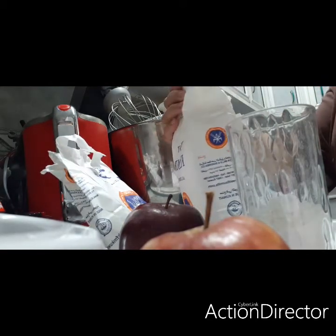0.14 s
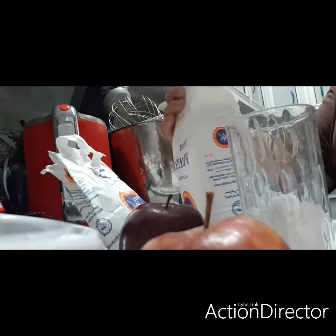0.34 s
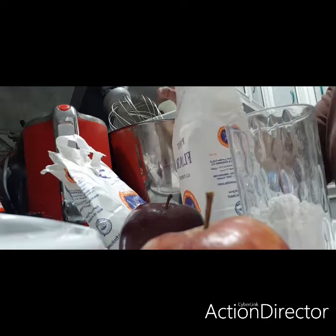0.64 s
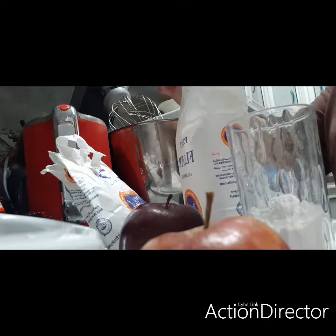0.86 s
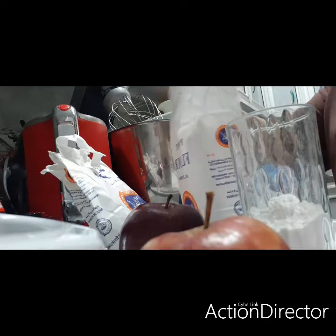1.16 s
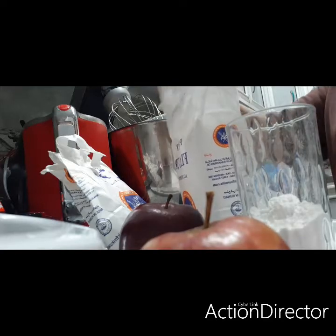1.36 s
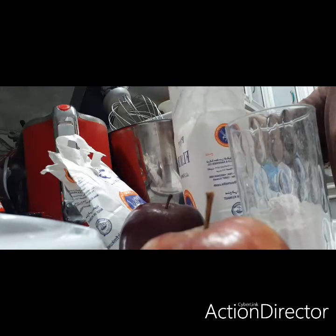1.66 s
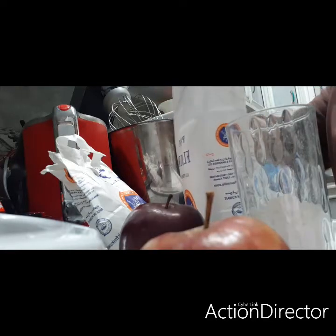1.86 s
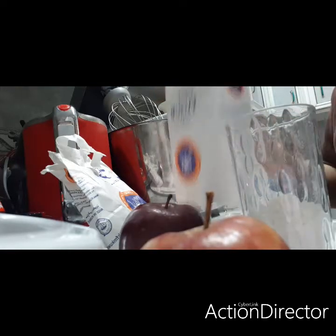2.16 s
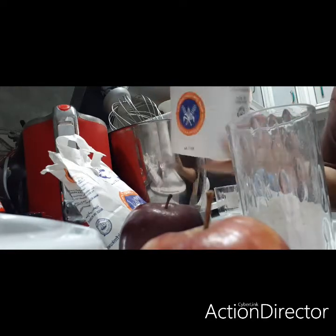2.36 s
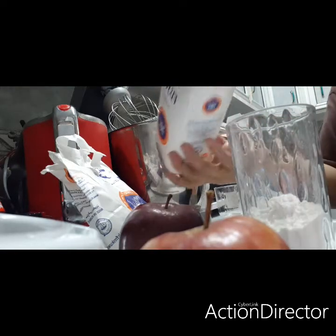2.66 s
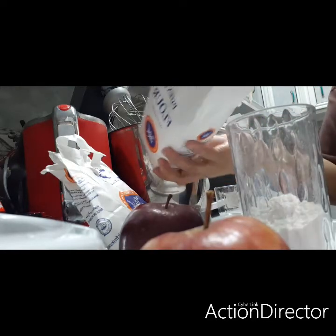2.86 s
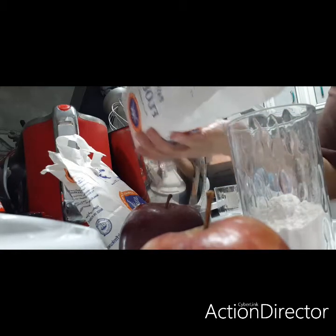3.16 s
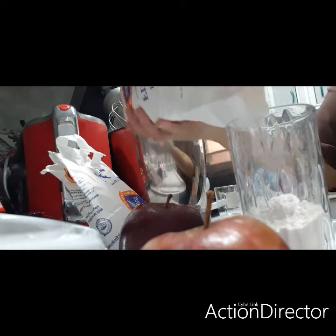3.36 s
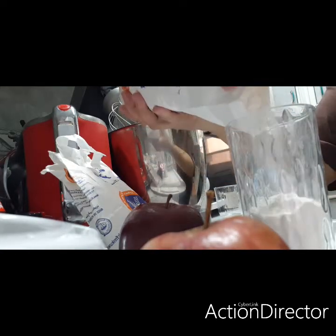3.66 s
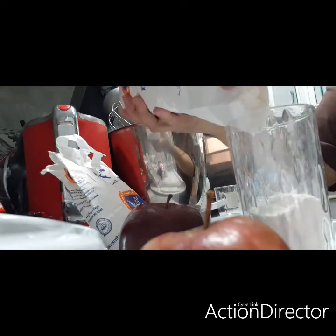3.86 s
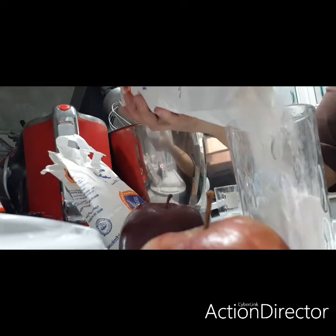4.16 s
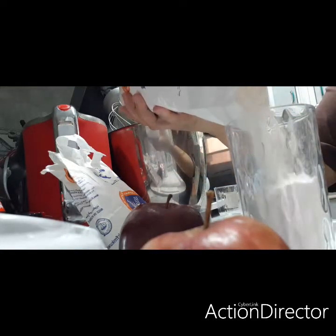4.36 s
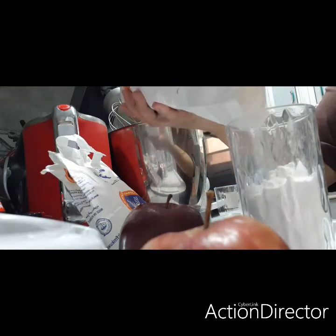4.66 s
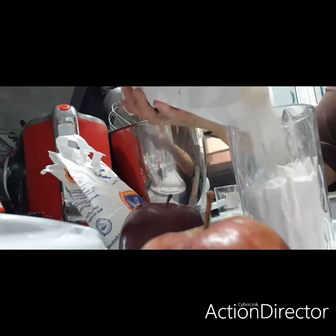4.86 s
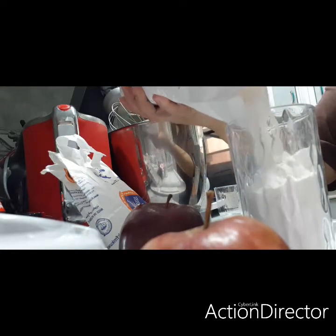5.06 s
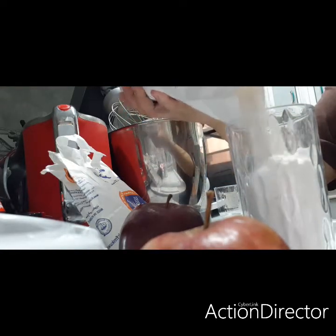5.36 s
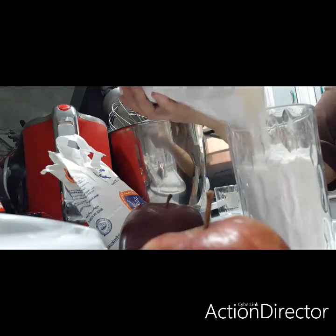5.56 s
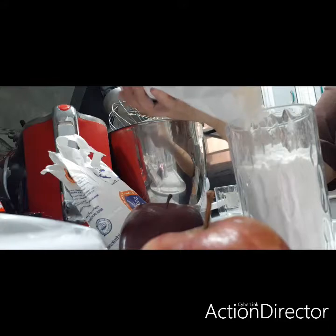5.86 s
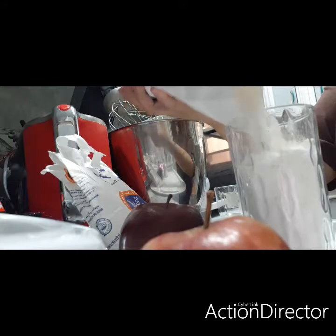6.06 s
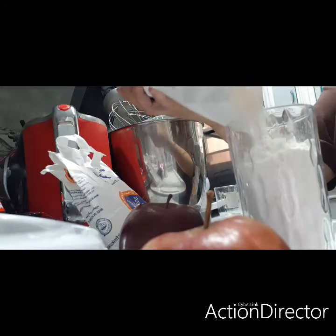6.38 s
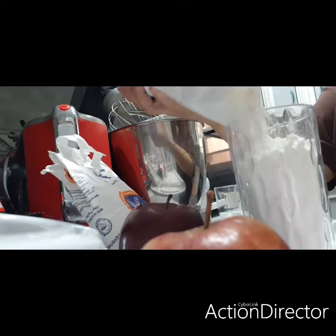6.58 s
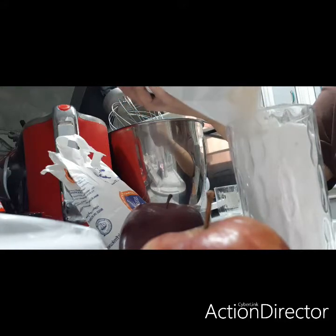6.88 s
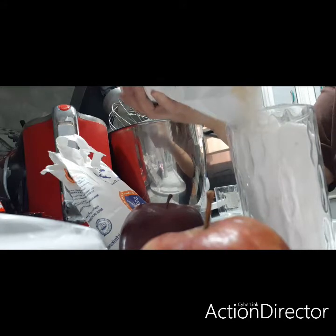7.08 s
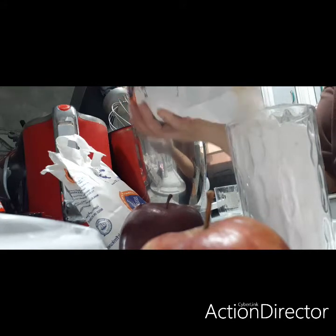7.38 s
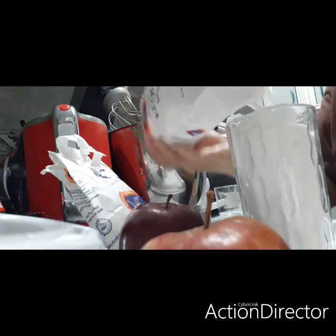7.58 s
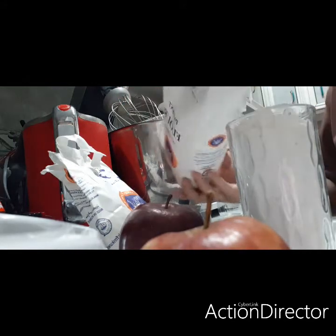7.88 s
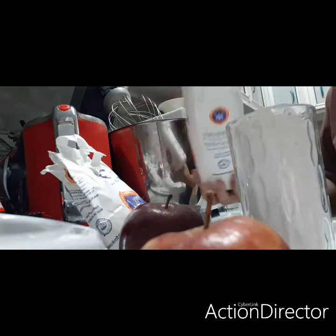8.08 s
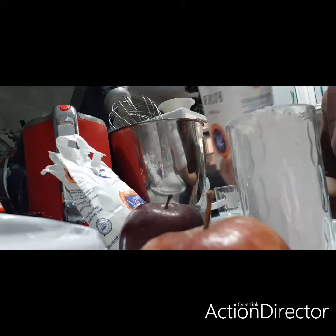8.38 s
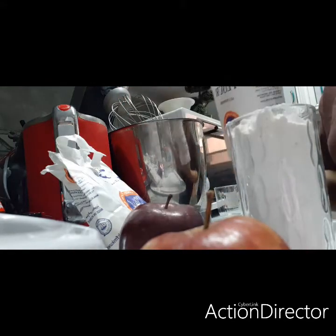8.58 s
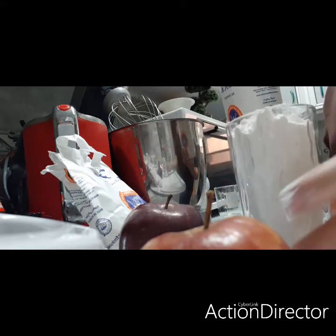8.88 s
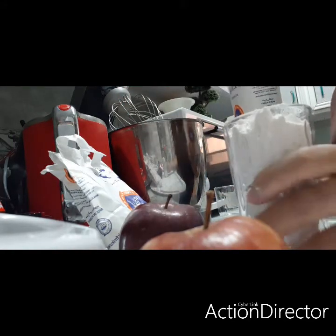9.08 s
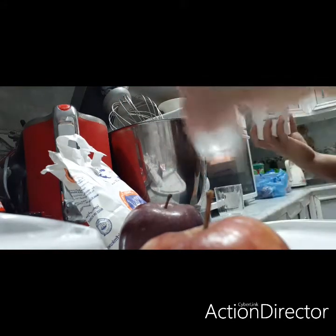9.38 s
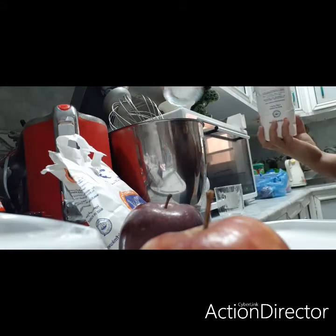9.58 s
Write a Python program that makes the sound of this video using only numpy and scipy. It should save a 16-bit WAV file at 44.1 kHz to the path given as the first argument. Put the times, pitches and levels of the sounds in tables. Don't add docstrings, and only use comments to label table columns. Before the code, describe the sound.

Close stereo pickup in a hard-walled kitchen: hands unroll a heavy paper flour bag with dense bright crackles and hollow panel pops. The mouth is yanked open with one very loud crack just after a second, then handling calms. The bag is tipped and shaken, giving soft rustles, ticks and a hushed slide of flour, and finally a faint low knock on the counter over quiet hum and thin hiss.

```python
import sys
import numpy as np
from scipy import signal
from scipy.fft import rfft, irfft, next_fast_len
from scipy.io import wavfile
from scipy.ndimage import uniform_filter1d, map_coordinates

SR = 44100
rng = np.random.default_rng(int(sys.argv[2]) if len(sys.argv) > 2 else 0)


def ratio(d):
    e = np.asarray(d, float) / 20
    return 10 ** e


def persist_wave(psi):
    counts = np.round(np.clip(psi, -1, 1) * 32767).astype(np.int16)
    wavfile.write(sys.argv[1], SR, np.atleast_2d(counts).T)


N = 429093

# freq_hz, likeness (1 = identical)
STEREO_LIKENESS = [(40, 0.61), (150, 0.75), (500, 0.78), (1200, 0), (2500, .0), (15000, 0.053)]


def unit(x):
    return x / np.sqrt(np.mean(x ** 2) + 1e-20)


def along(points, hz):
    f, v = np.transpose(points)
    return np.interp(np.log(hz + 1), np.log(f + 1), v)


def curves(rows):
    s, *columns = np.transpose(rows)
    return [np.interp(np.arange(N) / SR, s, c) for c in columns]


def filtered(x, response):
    m = next_fast_len(N + 8192)
    return irfft(rfft(x, m) * response(np.fft.rfftfreq(m, 1 / SR)), m)[..., :N]


def add(track, s, sound):
    track[:, round(s * SR):][:, :sound.shape[1]] += sound


def left_right(db):
    return ratio(db * np.array([[.5], [-.5]]))


def rush(spectrum, envelope=1, patchy_db=0):
    z = signal.stft(envelope * rng.standard_normal((2, N)), nperseg=256)[2]
    patches = rng.standard_normal(z.shape[1:])
    patches = uniform_filter1d(uniform_filter1d(patches, size=5, axis=0), size=12, axis=1)
    noise = signal.istft(z * ratio(patchy_db * unit(patches)), nperseg=256)[1][:, :N]

    def mid_side(hz):
        turn = np.arccos(np.clip(along(STEREO_LIKENESS, hz), -1, 1)) / 2
        return ratio(along(spectrum, hz)) * [np.cos(turn), np.sin(turn)]

    mid, side = filtered(noise, mid_side)
    return unit(np.array([mid + side, mid - side]))


def background():
    # freq_hz, density_db per Hz
    hum_spectrum = [(15, -47), (25, -23), (41, -16.5), (65, -9.5), (101, -5.5), (119, -16.5), (178, -6),
                    (420, -14), (864, -39.5), (5500, -41.5), (7150, -66.5), (12100, -120)]
    # freq_hz, density_db per Hz
    hiss_spectrum = [(3500, -16.5), (6050, -20.5), (6370, -1.5), (6600, -9), (6950, -11), (7200, -21),
                     (15500, -20), (16000, -46)]
    # time_s, gain_db
    ducking = [
        (2.44, -6),
        (2.5, 0),
    ]
    noise = ratio(-64) * rush(hum_spectrum, patchy_db=1.9) + ratio(-75) * rush(hiss_spectrum, patchy_db=.6)
    mains = ratio(-76.5) * np.sin(2 * np.pi * 59 * np.arange(N) / SR)
    return ratio(curves(ducking)[0]) * (noise * ratio([[-.6], [.6]]) + mains)


def kitchen(x):
    # freq_hz, t60_s
    decay = [(200, 0.15), (1500, 0.55), (6000, 0.38), (14000, 0.07)]
    wet, hop = np.zeros((2, N + 2 * SR)), SR // 3
    for start in range(0, N, hop):
        hz, t, z = signal.stft(rng.standard_normal((2, 16384)), SR, nperseg=256)
        alike = np.clip(along(STEREO_LIKENESS, hz), 0, 1)[:, None]
        z[1] = alike * z[0] + np.sqrt(1 - alike ** 2) * z[1]
        tail = signal.istft(z * ratio(-60 * t / along(decay, hz)[:, None]), SR, nperseg=256)[1]
        tail = tail / np.linalg.norm(tail[0])
        add(wet, start / SR + .003, signal.fftconvolve(x[:, start:start + hop], tail, axes=1))
    return wet[:, :N]


def bumps():
    # start_s, peak_db, pitch_hz
    counter = [
        (1.246, -30.5, 180),
        (8.966, -41, 108),
        (9.147, -48.5, 105),
        (9.176, -50, 135),
    ]
    # start_s, peak_db, pitch_hz
    palm = [(.39, -47, 150), (.744, -41, 156), (.944, -42, 170), (1.188, -29, 175), (1.449, -30, 170),
            (1.972, -42, 172), (2.006, -36, 110), (3.022, -42, 150), (3.894, -40, 135), (6.31, -46, 127),
            (5.858, -42, 150), (6.76, -43, 130)]
    track, t = np.zeros((2, N + SR)), np.arange(SR // 5) / SR
    knocks = [(*row, .14) for row in counter] + [(s, db - 4, hz, .06) for s, db, hz in palm]
    for s, db, hz, t60 in knocks:
        knock = np.sin(2 * np.pi * hz * t) * ratio(-60 * t / t60) * (1 - np.exp(-t / .006))
        add(track, s - .004, ratio(db) * left_right(1.8) * knock / np.abs(knock).max())
    return track[:, :N]


def wobble(rate):
    return map_coordinates(rng.standard_normal(int(N * rate / SR) + 4), [np.arange(N) * rate / SR])


def crumple(rate, spread_db, t60, smooth):
    sizes = ratio(spread_db * np.minimum(rng.exponential(size=N), 3))
    kicks = (rng.random(N) < rate / SR) * sizes
    return smooth + unit(signal.lfilter([1], [1, -ratio(-60 / SR / t60)], kicks))


def handling():
    # time_s, level_db
    grip = [(0, -50), (.26, -53), (1.1, -60), (1.6, -55), (1.84, -76), (2.2, -76), (2.44, -85), (2.51, -57),
            (2.9, -54), (3.3, -58), (3.86, -76), (3.9, -55), (4.8, -59), (4.93, -73), (6.5, -59),
            (7.3, -63), (8.5, -64), (9.04, -87)]
    # peak_s, fade_s per 10 dB, flex_db, scuff_db
    working = [(.37, .12, -42, -44.5), (.5, .11, -43, -42), (.75, .09, -38, -42), (.97, .14, -40, -44),
               (1.232, .025, -21, -29), (1.3, .1, -36, -39.5), (1.475, .08, -36, -35),
               (1.68, .07, -39, -50), (1.995, .08, -35.5, -39), (2.275, .1, -49, -56),
               (2.67, .035, -48, -46), (.84, .02, -45, -40), (2.508, .02, -55, -50),
               (2.99, .14, -45.5, -49)]
    # peak_s, fade_s per 10 dB, flex_db, scuff_db
    shakes = [(4.03, .15, -62, -50), (4.27, .06, -58, -53), (3.41, .09, -54, -49), (3.62, .1, -52, -48),
              (4.54, .12, -48, -45), (4.69, .05, -53, -51), (5.21, .05, -54, -53), (5.01, .06, -51, -59),
              (5.12, .12, -64, -55), (3.17, .09, -51, -60), (5.31, .07, -43, -45), (5.7, .08, -53, -49),
              (5.83, .07, -44, -44.5), (5.97, .06, -47.5, -54), (6.14, .08, -47.5, -54),
              (6.27, .08, -54, -51), (6.59, .06, -47, -46.5), (6.73, .14, -48, -48.5),
              (7.17, .14, -53, -52), (7.61, .06, -50, -52.5), (7.71, .1, -62, -48), (7.845, .06, -54, -42),
              (7.965, .04, -60, -45), (7.99, .03, -61.5, -38), (8.025, .05, -44.5, -49),
              (8.185, .04, -55, -42), (8.33, .11, -47, -49), (8.72, .17, -72, -56.5), (8.85, .06, -57, -64),
              (9.197, .04, -57, -70)]
    rise_share = .65
    t = np.arange(0, N / SR + .002, .002)
    s, fade_s, *peak_db = np.transpose([*working, *shakes])[:, :, None]
    fall_db = 10 * np.where(t > s, t - s, (s - t) / rise_share) / fade_s
    grip_db = np.interp(t, *np.transpose(grip)) + [[0], [1.5]]
    power = np.sum(ratio(2 * (np.array(peak_db) - fall_db)), axis=1) + ratio(2 * grip_db)
    return curves(np.transpose([t, *10 * np.log10(power)]))


def rustle():
    # freq_hz, density_db per Hz
    body_spectrum = [(35, -45.5), (60, -4.5), (163, 1), (414, 1.5), (612, -10.5), (700, -6.5), (910, -28.5),
                     (1540, -120)]
    # freq_hz, density_db per Hz
    flex_spectrum = [(210, -41.5), (350, -11), (622, -4), (1020, -8.5), (1240, -7.5), (2060, -12),
                     (3000, -17), (3900, -45.5), (6600, -120)]
    # freq_hz, density_db per Hz
    scuff_spectrum = [(1290, -21), (2200, -13.5), (3100, -8), (4100, -2.5), (4680, -4), (6700, -.5),
                      (7640, -5.5), (13100, -12), (15000, -10.5), (16000, -15)]
    # time_s, body_db
    heft = [(0.0, -70), (1.1, -55), (1.25, -35), (1.7, -61), (2.05, -58), (2.46, -72), (2.95, -55),
            (3.4, -64), (6.8, -56.5), (9.73, -67.5)]
    flex_db, scuff_db = handling()
    busy = np.clip((scuff_db + 56) / 12, .12, 1.5)
    buckles = busy * ratio(1.2 * wobble(30)) * crumple(220, spread_db=3, t60=0.015, smooth=0.043)
    fine_buckles = crumple(330, spread_db=2, t60=.009, smooth=0.81)
    body = rush(body_spectrum, crumple(60, spread_db=0, t60=0.013, smooth=1.8), patchy_db=2.5)
    flex = rush(flex_spectrum, buckles + .6 * fine_buckles, patchy_db=2.0)
    scuff = rush(scuff_spectrum, (.55 * buckles + .9) * ratio(1.5 * wobble(18)), patchy_db=3.0)
    body_db = 0.67 * curves(heft)[0] + 0.34 * flex_db
    sheet = ratio(body_db) * body + ratio(np.minimum(flex_db, -34) - 1.5) * flex + ratio(scuff_db - 4) * scuff
    return sheet * left_right(2.8)


def panel_pop(panel_hz):
    t = np.arange(1536) / SR
    draw = rng.random((17, 4))
    hz = np.append(panel_hz, 430 * 5.8 ** draw[1:, 0])[:, None, None]
    gain_db = np.append(0, -8 - 7 * draw[1:, 1])[:, None, None]
    octaves = np.log2(hz / panel_hz)
    gain = ratio(gain_db + np.minimum(-5 * octaves, 14 * octaves))
    lag = 0.00032 * (draw[:, 2:, None] - .5) * hz / 1200
    t60 = 0.034 * (800 / hz) ** 0.3
    ring = np.sum(gain * np.sin(2 * np.pi * hz * (t - lag)) * ratio(-60 * t / t60), 0)
    ring = ring * (1 - np.exp(-t / 0.0003))
    pushes = rng.standard_normal((1, 512)) ** 3 * t[:512] * np.exp(-t[:512] / 0.00071)
    pop = signal.fftconvolve(ring, pushes, axes=1)
    return pop / np.abs(pop).max()


def pops():
    # start_s, peak_db, panel_hz
    unroll = [(0.053, -25.5, 507), (0.107, -22.5, 627), (0.182, -35, 905), (0.306, -34.5, 818),
              (0.383, -21.5, 945), (0.438, -28, 1160), (0.471, -26, 610), (0.509, -25, 494),
              (0.585, -22, 1375), (0.656, -24, 430), (0.701, -28, 700), (0.74, -23.5, 710),
              (0.843, -29, 650), (0.855, -26, 1200), (0.93, -24, 1200), (1.018, -22, 950),
              (1.063, -31.5, 480)]
    # start_s, peak_db, panel_hz
    opening = [(1.152, -22, 910), (1.189, -18, 1200), (1.224, -5.5, 1180), (1.245, -13, 619),
               (1.271, -19, 617), (1.3685, -17, 700), (1.436, -21, 1250), (1.465, -16, 1210),
               (1.51, -28, 778), (1.606, -19, 760), (1.684, -21, 1244), (1.797, -27.5, 526),
               (1.9075, -21.5, 1160), (1.958, -23, 460), (1.978, -17, 510), (2.004, -26, 483),
               (2.128, -31, 590), (2.249, -25, 540), (2.548, -28.5, 1610), (2.629, -33, 1400),
               (2.806, -36.5, 479), (3.403, -28, 2130), (3.635, -37, 447)]
    # start_s, peak_db, panel_hz
    pouring = [(3.894, -20.5, 512), (4.705, -29.5, 510), (5.27, -33.5, 1270), (5.311, -29.5, 403),
               (5.596, -27.5, 1260), (5.666, -34, 1330), (5.71, -34.5, 1680), (5.809, -32, 735),
               (5.849, -31, 473), (5.957, -35, 446), (5.988, -30, 720), (6.109, -34, 1370),
               (6.313, -38, 480), (6.565, -32, 730), (6.595, -31, 485), (6.618, -30, 570),
               (6.696, -34, 710), (6.71, -23, 1280), (6.753, -26, 492), (6.913, -35, 480),
               (7.953, -41, 440), (8.015, -30, 514), (8.197, -23.5, 1200), (8.325, -28.5, 1170)]
    # start_s, peak_db, panel_hz
    flicks = [(.348, -32, 716), (.767, -24, 619), (.796, -27, 1290), (.952, -27, 589), (.968, -29, 665),
              (1.074, -31, 713), (1.083, -29, 716), (1.092, -29, 479), (1.105, -31, 708), (1.163, -21, 956),
              (1.207, -17, 622), (1.288, -19, 684), (1.304, -16, 1460), (1.325, -21, 466),
              (1.935, -28, 713), (2.53, -37, 608), (2.664, -40, 942), (2.974, -35, 412), (3.008, -28, 1350),
              (3.05, -36, 676), (7.844, -41, 455), (7.859, -37, 417), (8.029, -32, 525), (8.838, -46, 474),
              (8.857, -46, 638), (9.204, -47, 1500)]
    # start_s, peak_db, panel_hz
    fold_taps = [(0.09, -26, 595), (0.15, -33, 425), (0.205, -41, 423), (0.238, -39, 517),
                 (0.324, -31, 705), (1.404, -25, 705), (1.597, -25, 729), (1.642, -30, 479),
                 (1.744, -37, 705), (1.815, -39, 746), (2.793, -36, 506), (3.329, -40, 441),
                 (4.426, -40, 716), (4.544, -33, 713), (4.734, -44, 406), (4.831, -44, 487),
                 (4.998, -37, 501), (5.217, -40, 466), (5.567, -43, 511), (5.793, -29, 490),
                 (5.862, -32, 471), (5.945, -36, 455), (6.026, -41, 495), (6.13, -32, 638),
                 (6.151, -36, 517), (6.443, -39, 633), (6.486, -41, 482), (6.637, -37, 708),
                 (6.776, -34, 455), (6.871, -41, 498), (7.087, -42, 463), (8.096, -42, 654)]
    # start_s, peak_db, panel_hz
    further_pops = [(.275, -38, 600), (.385, -24, 1300), (.546, -37, 900), (.613, -39, 1500),
                    (.686, -34, 1300), (.712, -28, 600), (.741, -26, 1250), (.784, -34, 1300),
                    (.968, -35, 1300), (1.2438, -10, 615), (1.19, -23, 600), (1.272, -22, 1200),
                    (1.453, -24, 600), (1.673, -30, 600), (2.041, -36, 1300), (2.127, -35, 1400),
                    (2.743, -43, 600), (3.4, -33, 620), (3.941, -44, 600), (5.715, -40, 600),
                    (5.958, -35, 1500), (6.152, -37, 1100), (6.314, -41, 1400), (6.564, -36, 1600),
                    (6.622, -38, 1400), (6.711, -30, 620), (6.754, -31, 1300), (6.786, -36, 600),
                    (7.628, -41, 600), (2.2495, -21, 1560), (2.2495, -23, 2060), (1.377, -19, 620),
                    (1.475, -15, 1000), (5.85, -33, 1600), (5.99, -34, 1750)]
    taps = [(s, db - 3, hz) for s, db, hz in fold_taps]
    track = np.zeros((2, N + SR))
    for s, db, panel_hz in [*unroll, *opening, *pouring, *flicks, *taps, *further_pops]:
        add(track, s + .0003, ratio(db + np.array([[1.3], [-1.2]])) * panel_pop(panel_hz))
    return filtered(track[:, :N], lambda hz: 1 / np.sqrt(1 + (330 / (hz + 1)) ** 6))


def crease_burst(length_ms, fold_hz, tilt_db):
    # freq_hz, level_db
    crack_spectrum = [(880, -1.5), (1500, -1), (2060, -7), (2440, -4.5), (2830, -6), (4080, -1.5),
                      (12000, -12), (14900, -16), (16000, -14)]
    t, hz = np.arange(2048) / SR, np.fft.rfftfreq(2048, 1 / SR)
    burst = rng.standard_normal((2, 2048)) * ratio(4.97 * rng.standard_normal(2048))
    run = (1 - np.exp(-t / 0.0019)) * (np.exp(-t / (length_ms / 2600)) + .08 * np.exp(-t / 0.012))
    run += 0.21 * np.exp(-((t - .0013) / .00015) ** 2)
    paper = ratio(along(crack_spectrum, hz) + tilt_db * np.log2(np.clip(hz, 1500, 16000) / 5000))
    chance_hz = 2500 * 5 ** rng.random((5, 1))
    nearby = np.sum(0.99 / (1 + ((hz - chance_hz) / 250) ** 2), 0)
    fold = 1 + 2.5 / np.abs(1 + 1j * (hz - fold_hz) / 450) + nearby
    sound = irfft(rfft(burst) * paper * fold) * run
    return sound / np.abs(sound).max()


def cracks():
    # start_s, peak_db, brightest_hz, tilt_db per octave
    snaps = [(0.0907, -22, 6580, -0.5), (0.3732, -22, 6520, 6.5), (0.5006, -29, 3770, 3),
             (0.7406, -21, 6310, -0.8), (0.9326, -26.5, 3660, -4), (1.1928, -21.5, 2960, -3),
             (1.2085, -17, 4560, -2.5), (1.4659, -9.5, 5300, 8), (1.609, -15, 3200, -2.5),
             (1.9088, -20.5, 4100, -4.5), (1.9694, -15, 6840, 1), (2.0059, -25, 2570, -2),
             (3.0026, -23.5, 4170, -14), (3.0508, -22.5, 4800, -6.5), (4.998, -28, 3600, 5.7),
             (7.668, -30, 6300, 2)]
    # start_s, peak_db, brightest_hz, tilt_db per octave
    short_buckles = [(0.1081, -17.5, 3200, 0), (0.4249, -24.5, 6200, 2), (0.44, -19.5, 4960, 2),
                     (0.5863, -15, 6070, 2.8), (0.6866, -27, 3230, 0.3), (1.2452, -22, 4000, -5),
                     (1.306, -13.5, 4830, -5), (1.3266, -21, 3830, 2), (1.3765, -15, 4830, 4),
                     (1.4368, -24.5, 2710, -6.5), (2.2507, -25, 3050, -9.5), (2.5481, -33.5, 2960, -10),
                     (3.4017, -32, 3030, -5), (5.276, -30.5, 6450, 0), (5.301, -33, 6800, 7),
                     (5.3162, -24, 4300, -8), (5.3496, -15, 6800, 4), (5.453, -27, 6910, -0.8),
                     (5.8103, -29, 4200, -7.5), (5.96, -35, 3700, 1)]
    # start_s, peak_db, brightest_hz, tilt_db per octave
    rips = [(0.0534, -19.5, 4600, -0.5), (0.349, -21, 3570, 8), (0.385, -15, 5030, 3),
            (0.4622, -23, 2480, -2), (0.6563, -18.5, 3700, -2.3), (0.7028, -28, 3800, 2),
            (0.8573, -12.5, 6200, -3.7), (1.0208, -20, 3130, 0.5), (1.1541, -17, 2640, -2.7),
            (1.2243, -13.5, 4070, -4), (1.2895, -18, 4220, 4.5), (1.6811, -20, 4000, 3.5),
            (1.797, -37.5, 2540, -4.5), (2.5036, -38.5, 4080, 4.5), (3.8922, -24.5, 6470, -2.8),
            (5.5958, -28, 3200, -7), (6.7094, -33.5, 6500, -6.5), (8.2584, -33, 6350, 3)]
    # start_s, peak_db, brightest_hz
    pricks = [(.4718, -24, 2310), (.5462, -31, 2010), (.7964, -33, 2310), (.8036, -30, 2510),
              (.9687, -32, 4690), (1.2446, -15, 2480), (1.9035, -33, 2190), (1.936, -30, 3120),
              (1.9594, -27, 2500), (2.1564, -49, 4060), (2.4588, -56, 6020), (2.6784, -35, 3990),
              (2.7432, -45, 4250), (2.8514, -46, 4240), (3.1454, -43, 6210), (3.7209, -48, 6420),
              (4.2044, -53, 6370), (4.4268, -49, 5460), (4.8579, -46, 6520), (4.9526, -59, 6400),
              (5.1098, -54, 6200), (5.4674, -43, 3560), (5.8274, -33, 4230), (6.1304, -46, 2290),
              (6.4288, -50, 6490), (6.4867, -49, 5320), (6.5645, -39, 2190), (6.6977, -41, 6480),
              (6.7545, -39, 2680), (6.8224, -43, 6730), (6.9264, -42, 2510), (6.9444, -47, 2520),
              (7.3682, -49, 2530), (7.6564, -43, 6240), (8.1968, -37, 2130), (9.3008, -58, 6270)]
    # start_s, peak_db
    fibre_ticks = [(.0004, -22), (.1822, -27), (.3082, -31), (.5214, -28), (.7537, -24), (.7612, -23),
                   (.838, -25), (1.1634, -23), (1.9784, -18), (2.131, -39), (2.3326, -39), (2.6065, -40),
                   (2.6314, -35), (2.6554, -28), (2.9477, -34), (3.5618, -32), (3.6356, -31),
                   (4.6872, -36), (4.9791, -39), (5.1876, -42), (5.2445, -38), (5.329, -31), (5.4141, -34),
                  (5.5333, -37), (5.5677, -41), (5.6511, -36), (5.67, -38), (5.7922, -34), (5.8511, -35),
                  (5.9349, -44), (5.9974, -35), (6.0906, -42), (6.1144, -35), (6.1574, -41), (6.2447, -34),
                  (6.3145, -35), (6.9137, -37), (6.9755, -38), (7.4634, -41), (7.9553, -36), (7.9917, -33),
                  (8.326, -31)]
    creep_db = [-39, -39, -40, -37, -36, -46]
    creep_s, creep_gap_s = 7.013, .0705
    creep = [(creep_s + k * creep_gap_s, db) for k, db in enumerate(creep_db)]
    events = []  # (length ms, start s, peak dB, brightest Hz, tilt dB per octave)
    for length_ms, rows in [(2.6, snaps), (5.4, short_buckles), (10.5, rips)]:
        events += [(length_ms, *row) for row in rows]
    events += [(3.5, s, db + 1.5, 2600, -1.5) for s, db in [*fibre_ticks, *creep]]
    events += [(4, *row, -2.5) for row in pricks]
    track = np.zeros((2, N + SR))
    for length_ms, s, db, fold_hz, tilt_db in events:
        sound = crease_burst(length_ms, fold_hz, tilt_db)
        add(track, max(s - .0004, 0), ratio(db + 3.5) * left_right(rng.normal(0.8, 1.2)) * sound)
    return filtered(track[:, :N], lambda hz: 1 / np.sqrt(1 + (150 / (hz + 1)) ** 4))


def scene():
    # time_s, left_over_right_db
    held_side = [(0.0, 3.5), (0.08, 2.5), (0.97, 1.0), (6.83, 4.5), (6.89, 2.0), (7.48, 3.0), (7.56, 5.5),
                 (8.11, 2.0), (9.7, 2.5)]
    creases, panels = cracks(), pops()
    bag = (creases + panels + rustle()) * left_right(curves(held_side)[0] - 2.1)
    room = kitchen(ratio(-14) * creases + ratio(-17) * panels)
    return bag + room + bumps() + background()


def top_cut(x):
    return signal.sosfilt(signal.butter(12, 16780, fs=SR, output="sos"), x)


def record(dry):
    # freq_hz, gain_db
    microphone = [(30, -4), (70, -0.7), (7000, 3.5), (12500, 2.5), (15300, 5.5), (15850, -26)]
    # freq_hz, left_over_right_db
    ports = [(1200, 0), (4500, 1.5), (8500, -2.5), (13000, 3.5)]
    # peak_hz, width_hz, peak_db
    peak_hz, width_hz, peak_db = (6450, 250, 2)

    def response(hz):
        sheen_db = peak_db / (1 + ((hz - peak_hz) / width_hz) ** 2)
        return ratio(along(microphone, hz) + sheen_db) * left_right(along(ports, hz))

    return top_cut(filtered(dry, response))


dry = scene()
out = record(dry)
persist_wave(out)
```